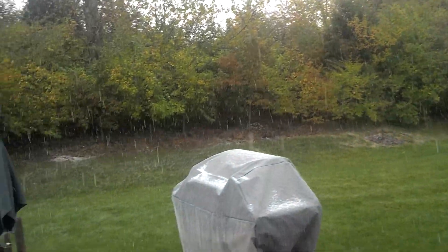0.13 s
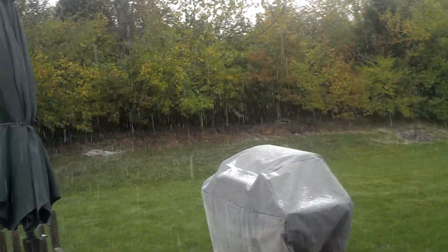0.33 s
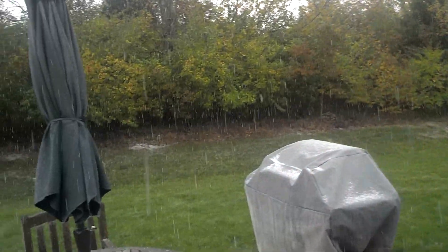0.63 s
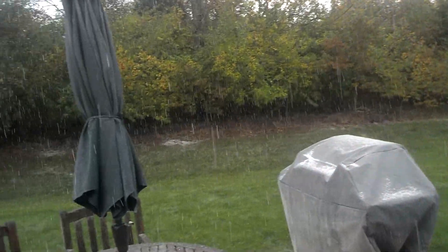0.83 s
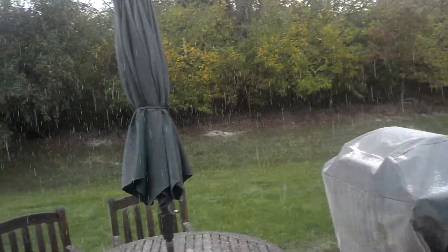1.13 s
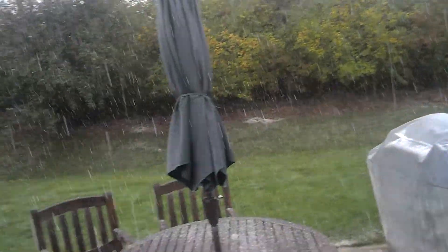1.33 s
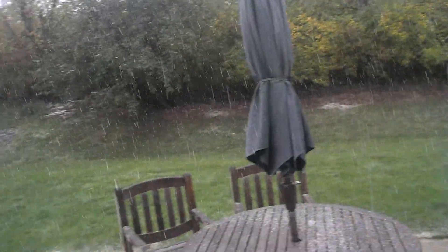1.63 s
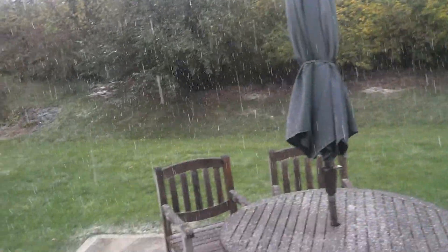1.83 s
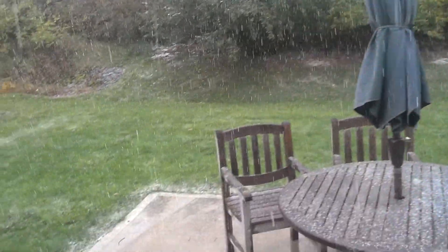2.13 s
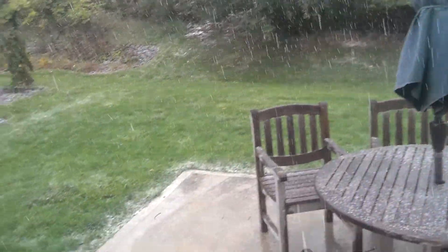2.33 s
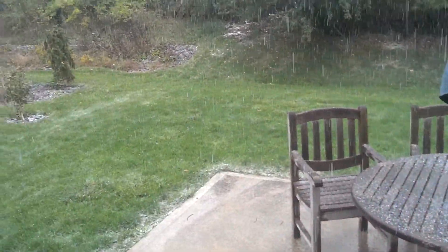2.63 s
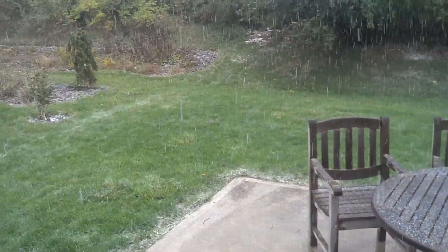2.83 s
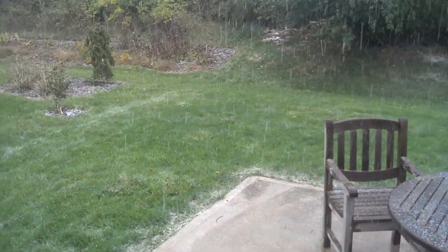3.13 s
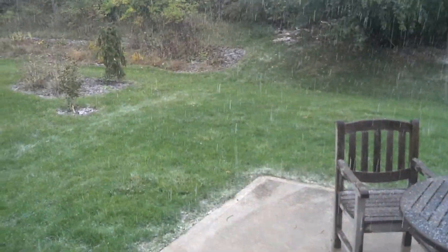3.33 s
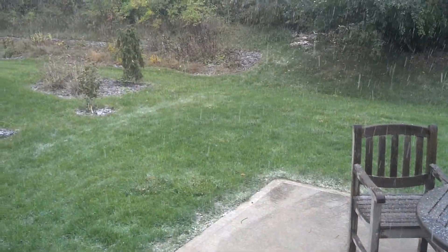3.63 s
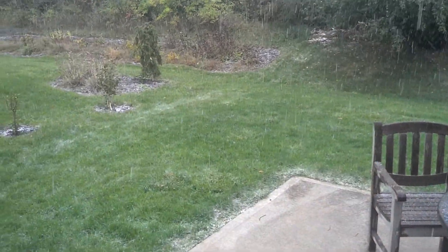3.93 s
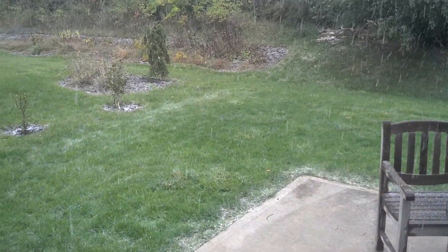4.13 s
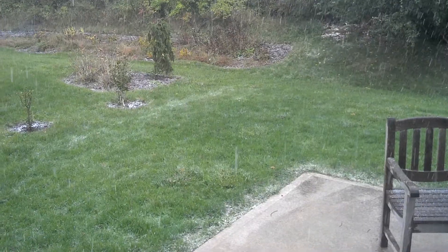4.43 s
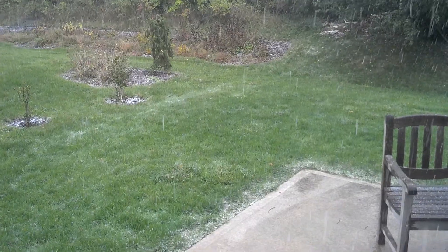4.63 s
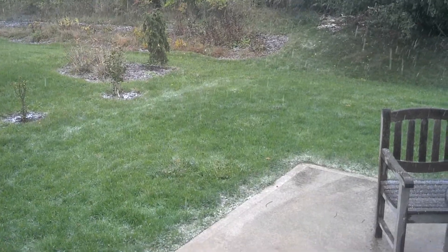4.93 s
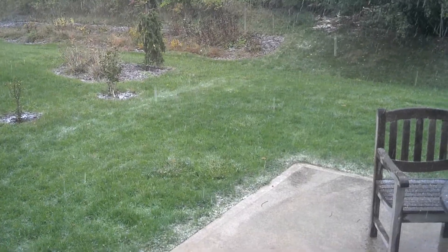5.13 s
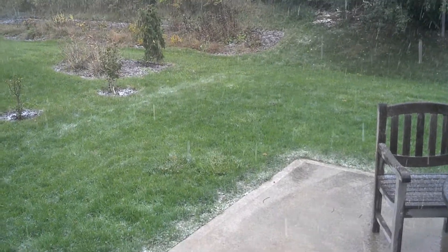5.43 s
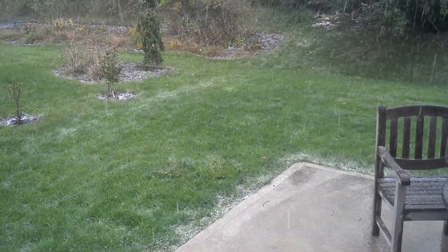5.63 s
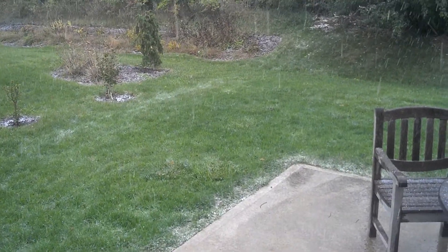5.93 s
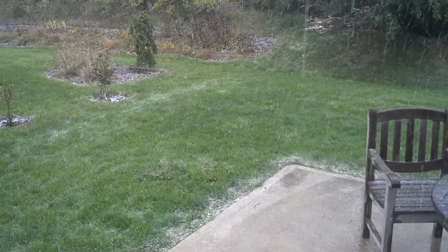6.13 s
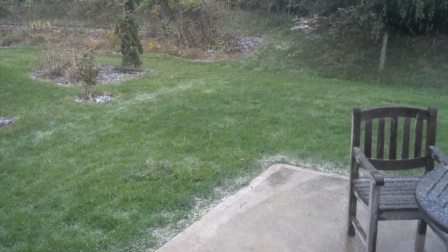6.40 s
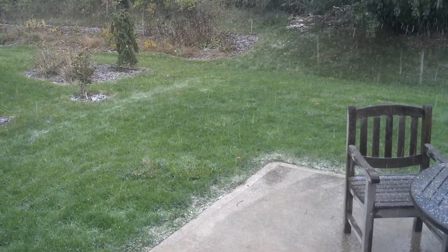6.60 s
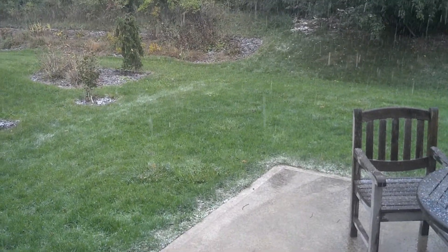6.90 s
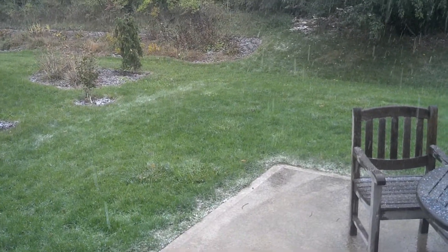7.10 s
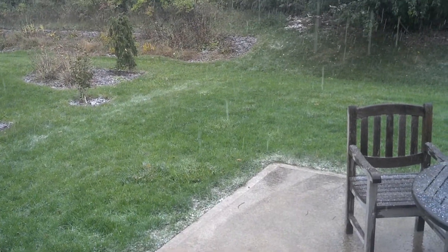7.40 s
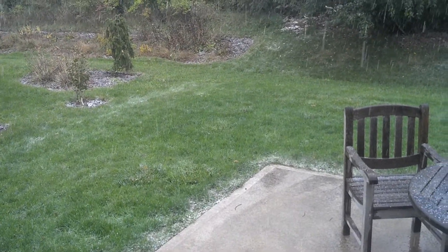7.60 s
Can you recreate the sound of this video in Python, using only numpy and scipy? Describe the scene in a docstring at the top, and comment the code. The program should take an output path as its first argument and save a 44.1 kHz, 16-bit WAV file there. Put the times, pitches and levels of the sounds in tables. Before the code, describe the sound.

Throughout about 8 seconds, graupel and snow fall with a dense, bright, grainy hiss on a wet patio, grass and wooden furniture, close and spread wide in stereo, wavering slightly in level. From 0 to about 2.4 s, pellets also drum softly and dully on a slack grill cover, diminishing as the camera turns away. A faint far engine enters around 0.4 s, dips, climbs in pitch, eases and is gone by 2.2 s. Soft low handling bumps come near 1.6 s, where the hiss drops slightly, and 2.5 s. Tiny faint ticks occur between 0.5 and 0.9 s, then near 3.6 and 4.5 s. Beneath lie a rush of trees, fluttering low air, uneven distant road rumble and faint mains hum. The hiss is a little weaker around 5 to 6 s, then recovers somewhat; one clear, sharp tick stands out near 7.5 s as the icy fall continues to the end.

```python
"""Graupel and snow hiss throughout on a wet patio and a table: random impulses shaped to a spectrum, varying in level.
At first pellets drum on a covered grill, fading as the camera turns away; short faint ticks, decaying rings, dot the hiss.
A far engine, gliding sines, pulls and fades out by 2.2 s; rings near 1.6 and 2.5 s are a hand bumping the camera.
Tree rush, road and low air (filtered noise) and a mains hum (sines) last throughout; a clear tick comes near 7.47 s.
Two close ports hear it all; the camera widens them by subtracting each, delayed, from the other."""
import sys
import numpy as np
from scipy import signal
from scipy.fft import rfft, irfft
from scipy.io import wavfile
from scipy.ndimage import uniform_filter1d

SR = 44100
rng = np.random.default_rng(int(sys.argv[2]) if len(sys.argv) > 2 else 0)


def store_wav(level_fs):
    """Save 16-bit WAV to argv[1]."""
    pcm = np.round(np.clip(np.atleast_2d(level_fs), -1, 1) * 32767)
    wavfile.write(sys.argv[1], SR, pcm.T.astype(np.int16))


N = 342216
TIME, FREQ = np.arange(N) / SR, np.arange(N // 2 + 1) * SR / N  # s, Hz
PORT_LAG_S = 16 / SR  # travel time of sound from one port to the other
TOP_HZ = 15750  # upper edge of the pass band
# all table levels and densities hold before the ports are subtracted


def undb(db):
    """Logarithmic level: decibels to amplitude ratio."""
    return 10 ** (np.asarray(db) / 20)


def curve(table, column):
    """Linear interpolation: one column of a time table at every sample."""
    rows = np.array(table)
    return np.interp(TIME, rows[:, 0], rows[:, column])


def colour(x, table, skirt_db=18):
    """Spectral shaping: white signals take a table's density, falling by skirt_db an octave outside it."""
    hz, *columns = np.transpose(table)
    octave, points = np.log2(FREQ + 1), np.log2(hz)
    outside = np.abs(octave - np.clip(octave, points[0], points[-1]))
    inside_db = np.array([np.interp(octave, points, column) for column in columns])
    db = inside_db - skirt_db * outside
    # unit-variance white noise has a density of 2 / SR per Hz
    return irfft(rfft(x) * undb(db) * np.sqrt(SR / 2), N)


def delay(x, seconds):
    """Linear phase: a phase lag proportional to frequency delays by any fraction of a sample."""
    return irfft(rfft(x) * np.exp(-2j * np.pi * FREQ * seconds), N)


def from_right(x, lag_s):
    """Time difference of arrival: a sound on the right reaches the right port first."""
    return np.array([delay(x, lag_s), x])


def walk(rate):
    """Slow random modulation: levels drawn at rate per second and smoothed twice; spread 1."""
    hold = int(SR / rate)
    steps = np.repeat(rng.standard_normal(N // hold + 1), hold)
    smooth = uniform_filter1d(uniform_filter1d(steps, hold), hold)[:N]
    return smooth / smooth.std()


def impacts(rate, scatter_db):
    """Shot noise: independent impulses at rate per second, many small and few large; spread 1."""
    hit = rng.random(N) < rate / SR
    size_db = scatter_db * np.minimum(rng.exponential(size=N), 5)
    pulses = hit * undb(size_db) * rng.choice([-1, 1], N)
    return pulses / np.std(pulses)


def patter(near_share, near_rate, scatter_db, flurry_db, flurry_rate, count=6):
    """Superposition: each size class fills its own band, near impulses over a Gaussian blur of far ones."""
    centres = np.log2(TOP_HZ * 3 / 4) - np.arange(count)[::-1]  # an octave apart
    share, spectrum = np.clip(near_share, 0, 1), 0  # share of the power
    for member in np.eye(count):
        # neighbouring bands crossfade at constant power
        band = np.sqrt(np.interp(np.log2(FREQ + 1), centres, member))
        near = np.sqrt(share) * impacts(near_rate, scatter_db)
        far = np.sqrt(1 - share) * rng.standard_normal(N)
        flurries = undb(flurry_db * walk(flurry_rate))
        spectrum = spectrum + band * rfft((near + far) * flurries)
    return irfft(spectrum, N)


TABLE_DB = -3.5  # pellets on the table, relative to the right-port density
FLURRY_DB, FLURRY_RATE = .8, 32  # spread [dB] and rate [per s] of the slight flurries
HISS_FOLLOW = 1.0  # dB gained for one dB of the overall level
# pellets on grass, stone and furniture, before the overall level:
# (frequency [Hz], left-port density [dB per Hz], right-port density [dB per Hz])
HISS = [(500, -96.5, -91), (1080, -84, -91), (1500, -86, -89.5), (1750, -86.5, -85), (2585, -81, -81.5),
        (2460, -83.5, -91.5), (3820, -80, -85.5), (7040, -82.5, -87.5), (8050, -87.5, -87),
        (10070, -88, -94), (10730, -90, -106), (16400, -99.5, -103)]


def graupel(count=3):
    """Incoherent addition: each port hears its own pellets, and both hear those on the table to the right."""
    left, right, table = (
        patter(near_share=0.29, near_rate=1100, scatter_db=3.0, flurry_db=FLURRY_DB, flurry_rate=FLURRY_RATE)
        for _ in range(count))
    around = colour(np.array([left, right]), HISS)
    side = from_right(colour(table, HISS)[1], PORT_LAG_S)
    return (around + undb(TABLE_DB) * side) * overall_level(HISS_FOLLOW)


# overall level of the hiss, with a sudden drop after the bump near 1.63 s; the mean is removed:
# (time [s], level [dB])
HISS_LEVEL = [(0, -39), (0.8, -38.5), (1.6, -38.5), (1.68, -40.5), (2.05, -40), (2.4, -39), (2.85, -39.5),
              (3.0, -40.5), (3.35, -39.5), (4.15, -39), (4.35, -40), (4.72, -39.5), (4.95, -41.5),
              (5.42, -40.5), (5.55, -41.5), (6.15, -42), (6.3, -40), (6.55, -41), (6.8, -39.5), (7.1, -39),
              (7.3, -40.5), (7.76, -41.5)]


def overall_level(follow, falling_db_per_s=0):
    """Amplitude modulation: a layer follows the level of the hiss, and may fall steadily on top of that."""
    db = follow * curve(HISS_LEVEL, column=1) - falling_db_per_s * TIME
    return undb(db - db.mean())


# pellets on the grill cover, before it turns away: (frequency [Hz], density [dB per Hz])
COVER = [(350, -84), (500, -77), (800, -89.5), (1200, -92.5), (1550, -87), (1950, -85), (2600, -99)]
# the cover drops away as the camera turns from it: (time [s], level [dB])
FACING_COVER = [(0, 0), (.9, -3.5), (1.6, -7.5), (2.4, -26)]


def cover():
    """Forced vibration: impacts drive the slack grill cover straight ahead, alike at both ports."""
    taps = colour(impacts(rate=4400, scatter_db=2.0), COVER)[0]
    return taps * undb(curve(FACING_COVER, column=1))


def knocks(table, cycles):
    """Transient response: each ring's envelope peaks after some cycles, then dies away."""
    out = np.zeros((2, N))
    for start, hz, db, pan_db in table:
        turns = np.maximum(TIME - start, 0) * hz
        envelope = turns / cycles * np.exp(1 - turns / cycles)
        ring = envelope * np.sin(2 * np.pi * turns)
        out += undb(db + np.array([[pan_db], [-pan_db]]) / 2) * ring
    return out


# short faint ticks; the clear one, with its bounce, comes near 7.47 s:
# (time [s], ring frequency [Hz], envelope peak [dB], left minus right [dB])
TICKS = [(.5093, 9500, -33, 0), (.7657, 4000, -34, 0), (.8492, 9000, -34.5, 0), (.9029, 10000, -36, 0),
         (3.625, 9000, -37, 0), (4.5074, 9600, -37, 0), (7.4686, 4300, -23.9, 0), (7.4723, 4300, -32, 0)]


def ticks():
    """Impulse response: each tick is a short, heavily damped ring."""
    return knocks(TICKS, cycles=.6)


# the hand bumps the housing:
# (time [s], ring frequency [Hz], envelope peak averaged over the ports [dB], left minus right [dB])
BUMPS = [(1.6315, 148, -43, -25), (2.543, 210, -38, 9)]


def bumps():
    """Structure-borne sound: a bump on the housing rings low, unequally at the two ports."""
    return knocks(BUMPS, cycles=0.43)


TREES_FOLLOW = 0.72  # dB gained for one dB of the overall level
FALLING_DB_PER_S = 0.1  # steady fall of the trees and the upper air, beyond that of the hiss
# rush of the trees, before flutter and overall level: (frequency [Hz], density [dB per Hz])
TREES = [(110.0, -83), (190.0, -77.5), (300.0, -78.5), (360.0, -75.5), (500.0, -80), (750.0, -84.5),
         (1200.0, -94), (2200.0, -100.7)]


def trees(lag_s=0.00015, flutter_db=.5, flutter_rate=9):
    """Broadband noise: wind and pellets in far leaves merge into one rush, ahead and to the right."""
    rush = colour(rng.standard_normal(N), TREES)[0] * undb(flutter_db * walk(flutter_rate))
    return from_right(rush * overall_level(TREES_FOLLOW, FALLING_DB_PER_S), lag_s)


ENGINE_DB, ENGINE_ATTACK_S, ENGINE_OFF_S, ENGINE_RELEASE_S = -49, 0.35, 1.98, 0.19  # fade starts at OFF
WHINE_HZ, WHINE_DB = 366.5, -64  # centre pitch and level of a faint whine that lasts as long as the engine
MAINS_HZ = 60
# mains hum, before waver and gain: (multiple of the mains frequency, rms level [dB])
HUM = [(2, -53.5), (3, -62), (6, -68)]
# a far engine pulls and eases off: (time [s], pitch before wander [Hz])
ENGINE = [(.35, 122), (.75, 117), (1.1, 124), (1.45, 137), (1.75, 146), (2, 140), (2.3, 125)]


def tone(hz, wander_hz, wander_rate):
    """Frequency modulation: the phase is the running sum of a pitch that wanders at random."""
    return 2 * np.pi * np.cumsum(hz + wander_hz * walk(wander_rate)) / SR


def machines(gain, waver_db=0.5, wander_hz=1.125, overtone_db=-12, right_port_db=-8):
    """Additive synthesis: mains hum and far engine off to the left, wavering in the wind."""
    hum = sum(np.sin(tone(multiple * MAINS_HZ, wander_hz, 13)) * undb(db + waver_db * walk(13))
              for multiple, db in HUM)
    turn = tone(curve(ENGINE, column=1), wander_hz, 13.1)
    engine = np.sin(turn) + undb(overtone_db) * np.sin(turn * 3 / 2)
    rise, fall = TIME / ENGINE_ATTACK_S, 1 - (TIME - ENGINE_OFF_S) / ENGINE_RELEASE_S
    running = np.clip(np.minimum(rise, fall), 0, 1)
    engine = engine * running * undb(ENGINE_DB + waver_db * walk(9.0))
    drone = np.sqrt(2) * gain * (hum + engine)  # root 2 turns rms into amplitude
    whine = np.sqrt(2) * np.sin(tone(WHINE_HZ, wander_hz, 12.7))
    whine = whine * running * undb(WHINE_DB + waver_db * walk(9.5))
    # the left port hears the drone first and louder; the whine reaches both alike
    return np.array([drone, undb(right_port_db) * delay(drone, PORT_LAG_S)]) + whine


GUST_DB, GUST_RATE = 1.8, 18  # spread [dB] and rate [per s] of the flutter in the deepest air
AIR_FOLLOW = 0.7  # dB gained for one dB of the overall level
# low air, before its level: (frequency [Hz], left-port density [dB per Hz], right-port density [dB per Hz])
RUMBLE = [(30, -99, -98), (45, -89, -84), (62, -87, -87), (100, -87, -80.5), (185, -83, -84),
          (282, -88.5, -98), (370, -79.5, -84), (565, -85, -89.5), (1030, -102, -100)]
# slow level of the low layers, also used by low_level(): (time [s], level [dB])
LOWS = [(0, -.5), (1.3, -.5), (1.8, 2), (2.2, 0), (2.55, 2), (3.1, -.5), (3.7, 1), (4.3, 1), (4.65, 2.5),
        (5.2, 1), (5.55, -3), (6.3, -2), (7.2, -2), (7.76, -3.5)]


def rumble(split_hz=250):
    """Turbulence noise, independent at each port: gusts heave the deep part, the rest follows the hiss."""
    air = colour(rng.standard_normal((2, N)), RUMBLE)
    deep = signal.sosfiltfilt(signal.butter(2, split_hz, fs=SR, output="sos"), air)
    heave = undb(curve(LOWS, column=1) + GUST_DB * walk(GUST_RATE))
    return deep * heave + (air - deep) * overall_level(AIR_FOLLOW, FALLING_DB_PER_S)


DIP_DB, DIP_RATE = 3.5, 26  # depth at one spread of the walk [dB], rate [per s]


def low_level():
    """Amplitude modulation: a slow level curve with random dips on the low layers."""
    drop_db = DIP_DB * np.maximum(walk(DIP_RATE), 0) ** 2
    return undb(curve(LOWS, column=1) - drop_db)


# rumble of a far road, before its gain: (frequency [Hz], density [dB per Hz])
TRAFFIC = [(85, -79.5), (115, -72), (150, -74.5), (180, -73), (240, -81.5)]


def traffic(gain):
    """Coherent arrival: one low, uneven road rumble reaches the left port before the right."""
    road = colour(rng.standard_normal(N), TRAFFIC)[0]
    return from_right(road * gain, PORT_LAG_S)[::-1]  # swapped, so from the left


# short level dips set by hand in the low band:
# (centre time [s], half length to 1/e of the depth [s], depth [dB])
LOW_BAND_DIPS = [(.70, .035, 14), (1.22, .045, 14), (2.99, .03, 10), (3.18, .025, 10), (3.50, .02, 8),
                 (3.97, .04, 7), (4.74, .03, 9), (5.56, .04, 13), (7.64, .03, 12)]


def dip_low_band(x, below_hz=190):
    """Band-limited gain: short level dips, set by hand, act on the low band only."""
    low = signal.sosfiltfilt(signal.butter(4, below_hz, fs=SR, output="sos"), x)
    dips_db = sum(depth_db * np.exp(-((TIME - at) / half) ** 2) for at, half, depth_db in LOW_BAND_DIPS)
    return x - low + low * undb(-dips_db)


def scene():
    """Linear superposition: the sounds add at the left and right port."""
    weather = graupel() + cover() + trees() + rumble()
    gain = low_level()
    return dip_low_band(weather + traffic(gain) + machines(gain)) + ticks() + bumps()


CROSS_GAIN = .999  # share of the opposite port that is subtracted
RIGHT_GAIN_DB = .7  # the right channel is a little more sensitive than the left


def record(dry):
    """Delay-and-subtract beamforming: beams face left and right and comb the hiss; then the top is cut."""
    beams = dry - CROSS_GAIN * delay(dry[::-1], PORT_LAG_S)
    wide = beams * undb([[-RIGHT_GAIN_DB / 2], [RIGHT_GAIN_DB / 2]])
    # order 12, .1 dB ripple, 80 dB stop band
    return signal.sosfilt(signal.ellip(12, .1, 80, TOP_HZ, fs=SR, output="sos"), wide)


dry = scene()
out = record(dry)
store_wav(out)
```